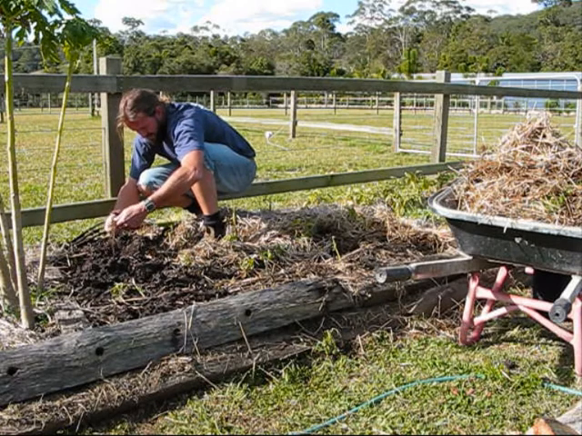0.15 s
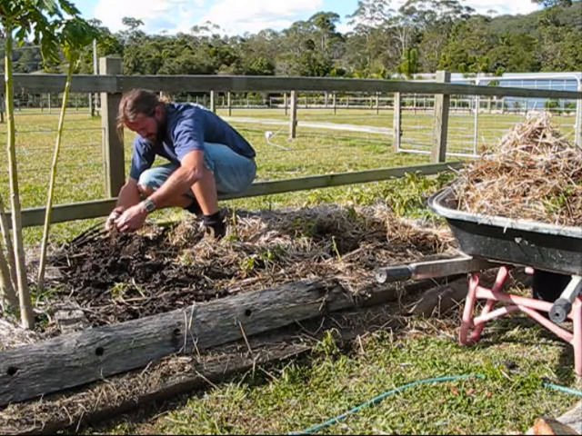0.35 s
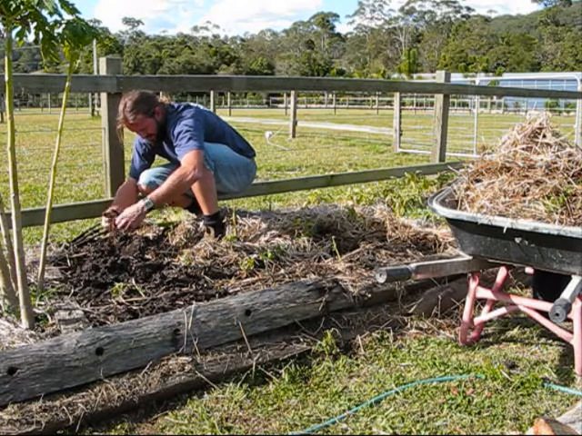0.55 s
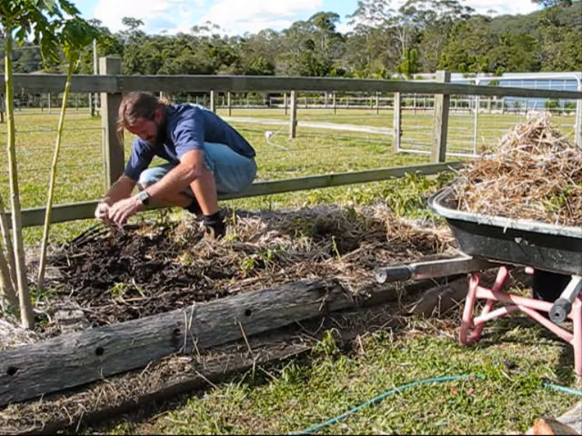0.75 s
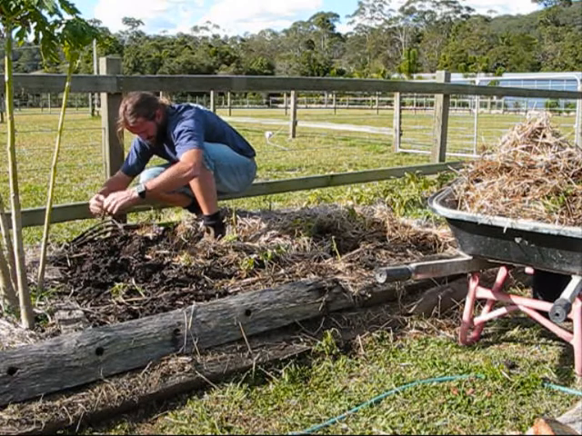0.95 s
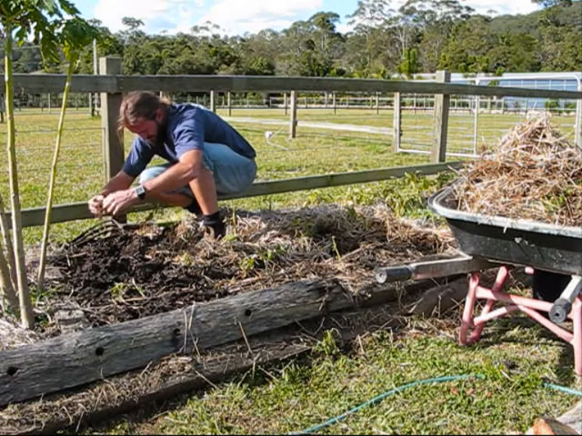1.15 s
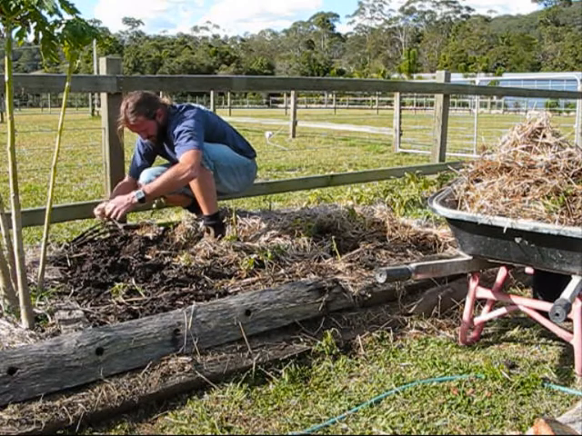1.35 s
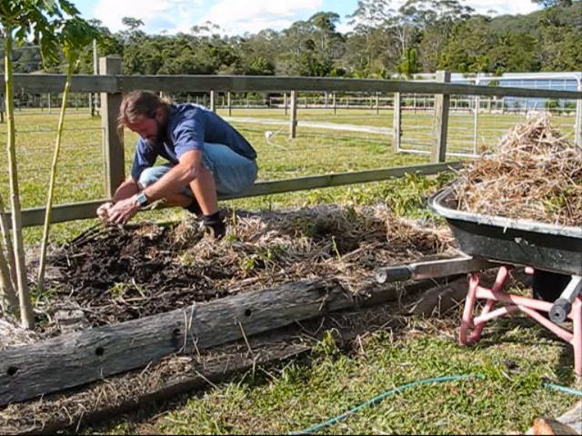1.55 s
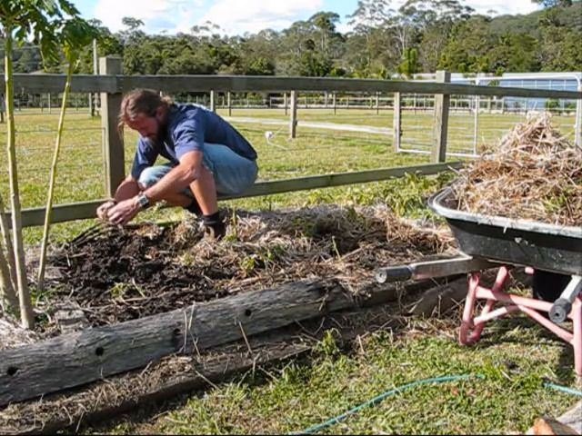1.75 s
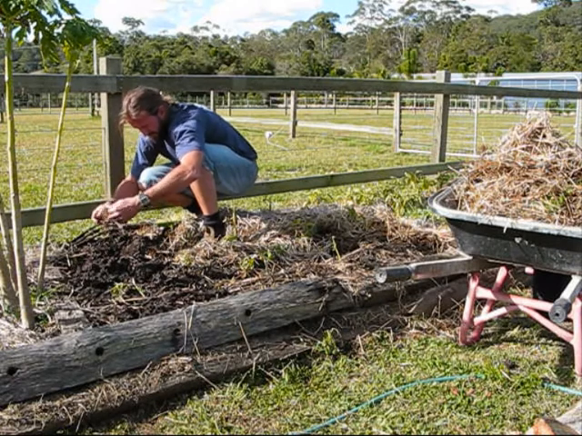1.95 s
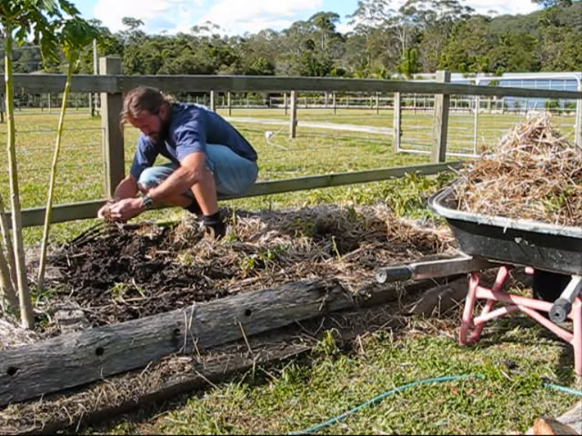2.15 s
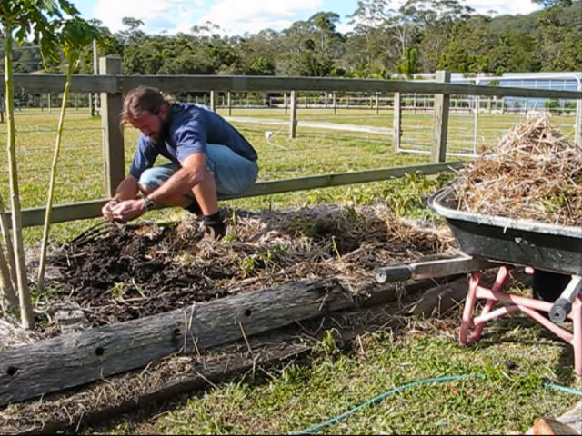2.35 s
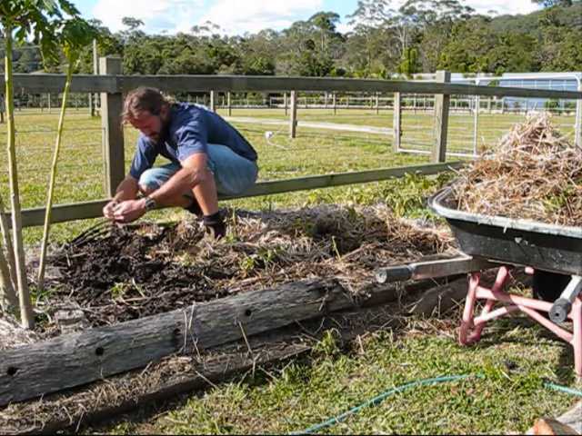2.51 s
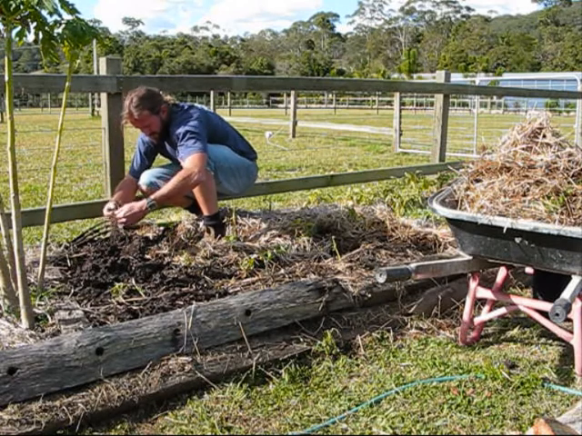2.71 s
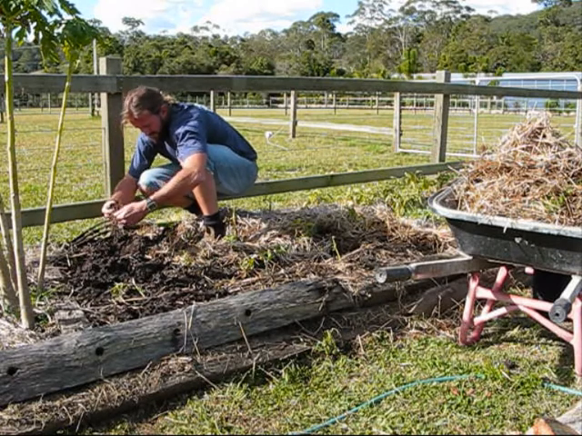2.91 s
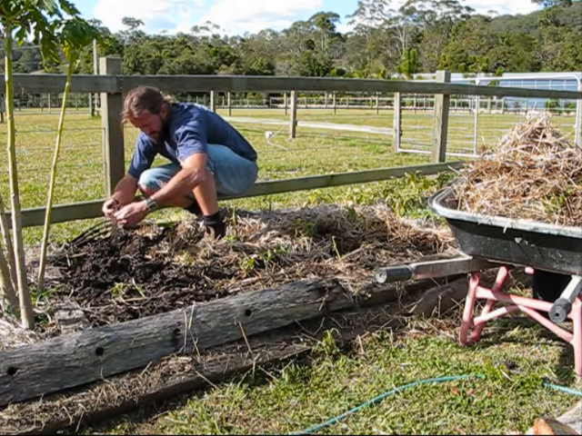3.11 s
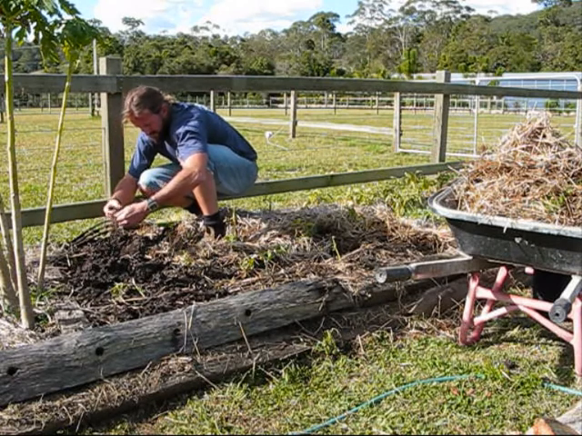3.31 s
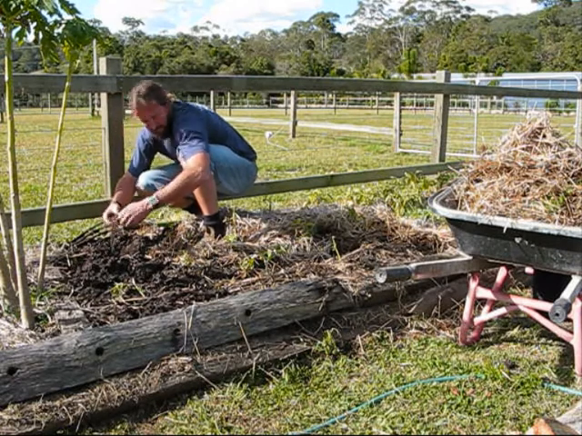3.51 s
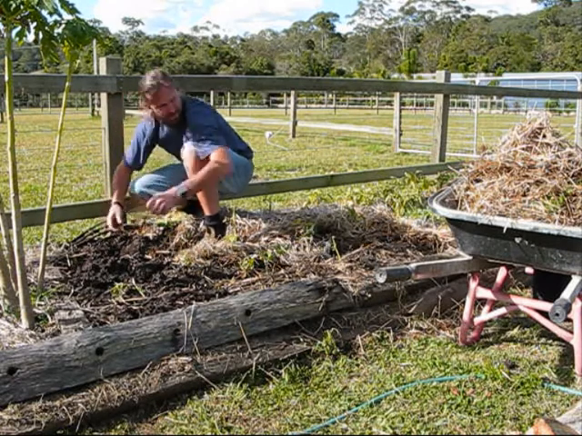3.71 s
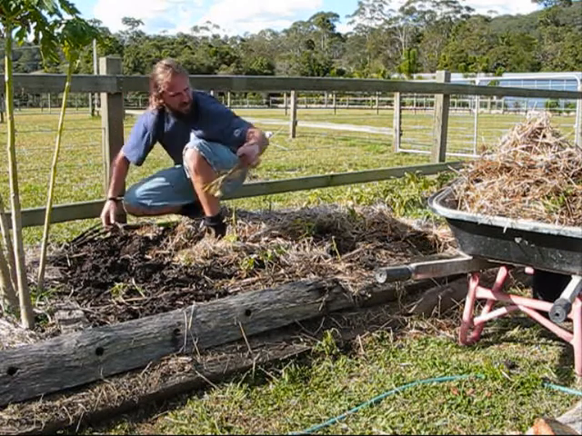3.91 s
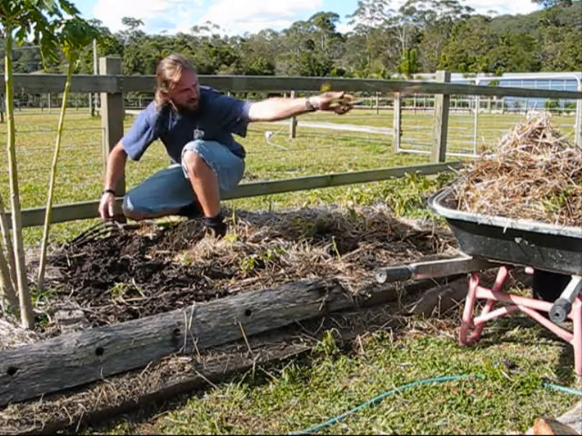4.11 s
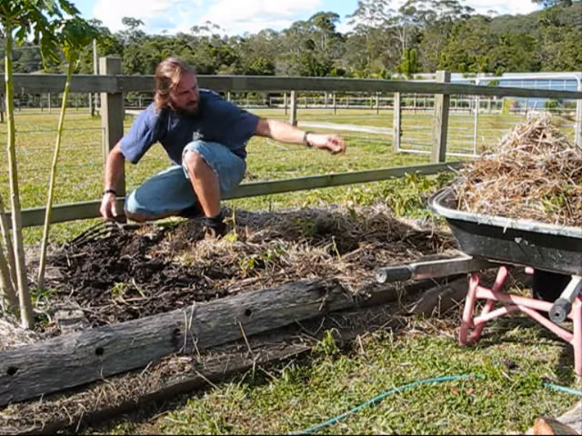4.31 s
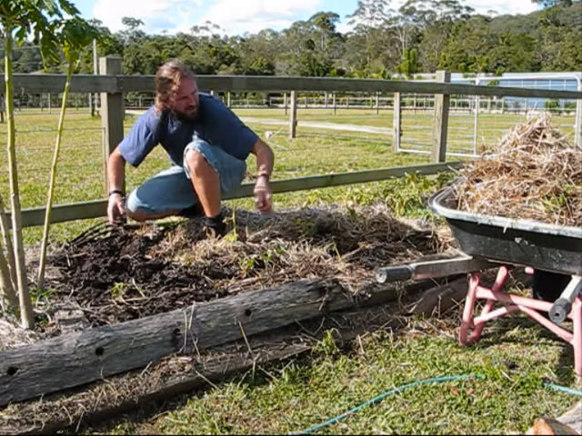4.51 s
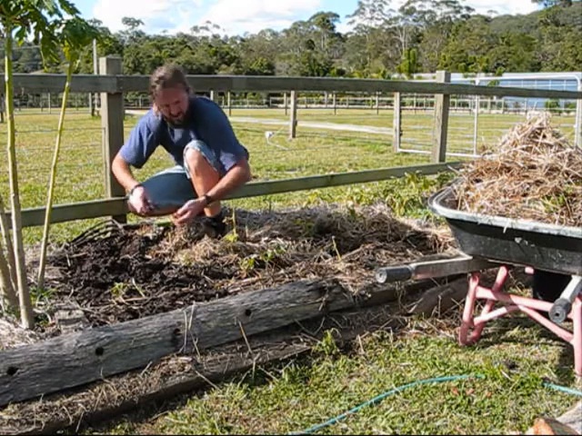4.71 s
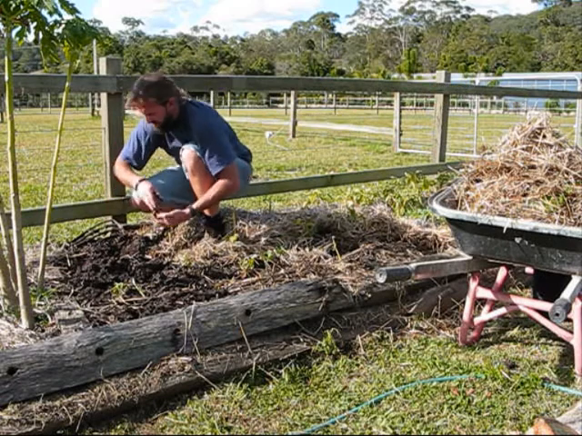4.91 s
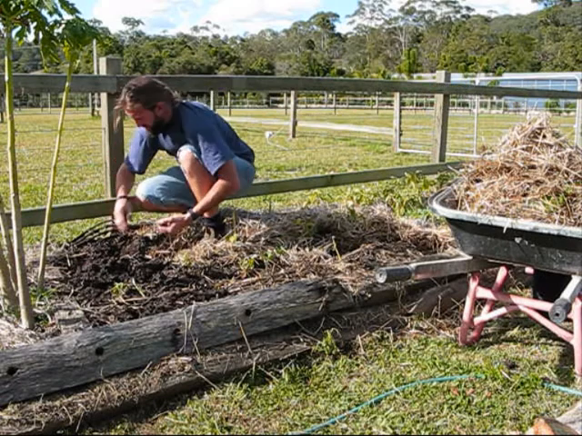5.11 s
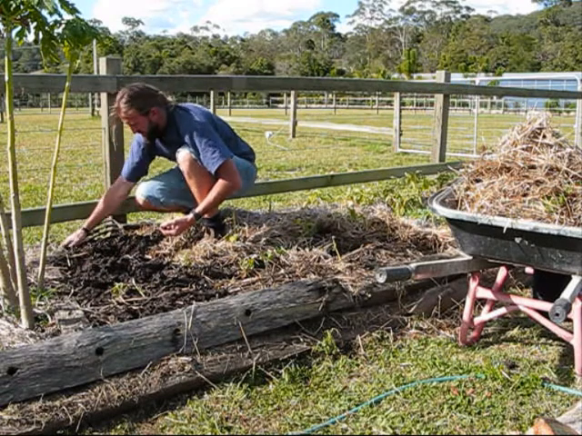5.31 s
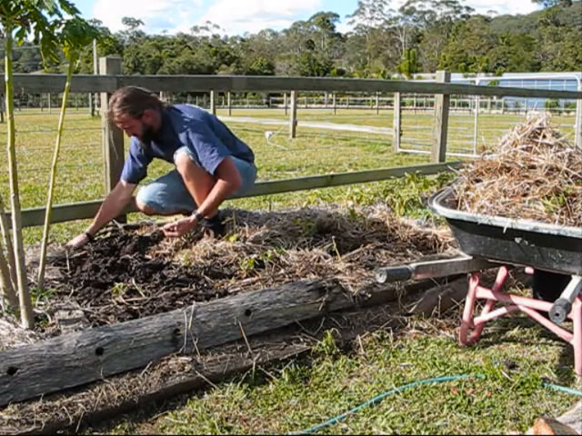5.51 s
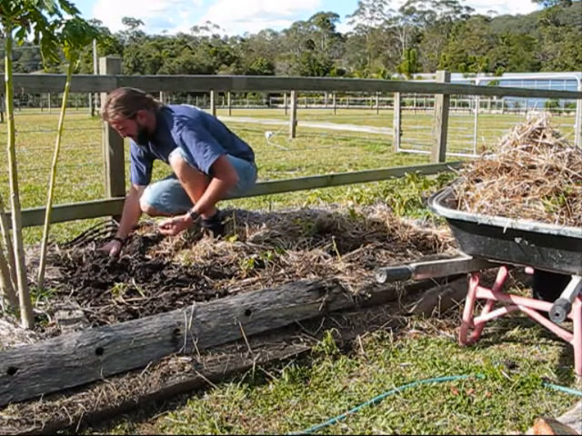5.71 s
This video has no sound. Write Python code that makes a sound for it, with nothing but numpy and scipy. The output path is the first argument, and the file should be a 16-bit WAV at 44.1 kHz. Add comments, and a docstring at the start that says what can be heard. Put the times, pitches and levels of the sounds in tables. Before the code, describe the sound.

Soft garden breeze and buzzing crickets, with one short raspy parrot call, light picking at mulch and a crackle of thrown straw.

```python
"""A garden in open country, one microphone feeding both channels. A few steps away a gardener picks
through soil and dry straw mulch, a rustle of tiny stalk fractures, then tosses a handful that crashes
into the straw close by. A parrot screeches once, in rasping syllables with a two-voiced middle.
Small birds whistle far off and bush crickets buzz their wings in the grass.
Under it all lie the hiss of a breeze in distant trees and a faint low drone."""
import sys
import numpy as np
from scipy import signal
from scipy.fft import rfft, irfft, next_fast_len
from scipy.io import wavfile
from scipy.ndimage import map_coordinates

SR = 44100
rng = np.random.default_rng(int(sys.argv[2]) if len(sys.argv) > 2 else 0)


def store_pcm(level_fs):
    """Save levels as 16-bit WAV."""
    pcm = np.round(np.clip(level_fs, -1, 1) * 32767).astype(np.int16)
    wavfile.write(sys.argv[1], SR, np.atleast_2d(pcm).T)


N = 253575
TOP_HZ = 15850

# Noise colours at the microphone. Each row: frequency in Hz, relative spectral level in dB.
BREEZE_COLOUR = [(15, -15), (40, -0.5), (300, -.5), (680, 0), (1200, -2.5), (1800, -4.5), (3200, -8),
                 (6000, -11.5), (8500, -11.5), (10000, -15.5), (12500, -20.5), (15500, -27.5)]
DRONE_COLOUR = [(60, -39), (76, 1), (82, 1.5), (89, -6), (110, -31)]
CHORUS_COLOUR = [(7200, -40), (7700, -9), (7870, -3), (8050, -9), (8600, -30), (9500, -50)]  # far crickets blurred into one thin band
MULCH_COLOUR = [(400, -20), (1200, -8), (2500, -4.5), (5000, -5), (8000, -3.5), (10500, -1.5),
                (13500, -0.5), (15800, -2.5)]  # straw mixed with damp soil
CLOD_COLOUR = [(300, -26), (1200, -18), (2400, -2.5), (5000, -0.5), (7200, -2.5), (10000, -17),
               (15800, -22)]
SPLINTER_COLOUR = [(1000, -30), (5000, -11), (9000, -2.5), (13500, 1.5), (15800, -3.5)]
RASP_COLOUR = [(1200, -31), (2400, -3), (3400, 0), (5000, -5), (6500, -7), (8000, -16), (10500, -14),
               (15800, -30)]
STRAW_COLOUR = [(500, -38), (1200, -16), (2500, -10), (5000, -7.5), (8000, -8), (10500, -5.5),
                (12500, -1.5), (14000, 0.5), (15800, -3.5)]

# Swells of sound. Each row: middle in seconds, length in seconds, level in dB.
BREEZE_GUSTS = [(3.6, 0.79, -56.5)]
CHORUS_SWELLS = [(.5, 1, -61.5), (2.6, 1.15, -61), (4.7, 2.4, -64.5)]
MULCH_STROKES = [(1.5, .12, -61), (2.05, .4, -62), (3.62, .09, -53), (3.88, .5, -50), (4.36, 0.23, -54),
                 (5.19, .22, -54.5), (5.41, 0.054, -47.5), (5.52, 0.22, -48), (5.698, .115, -41)]
SOIL_SCRAPES = [(3.695, 0.044, -52.5), (3.82, .16, -56.5), (4.17, .025, -52)]

# Single crickets in the grass. Each row: start and end in seconds, final centre pitch in Hz,
# final level in dB, swell in dB, wing strokes per second.
CRICKET_BUZZES = [(0, 1.245, 8670, -54, 16, 112), (1.5, 2.97, 8700, -54.5, 15, 111),
                  (4.1, 5.245, 8660, -53, 19, 113), (0, .62, 8120, -56.5, 11, 124),
                  (1.9, 2.62, 8150, -57, 10, 140), (3.5, 4.7, 8130, -57.5, 13, 124),
                  (3, 3.35, 9100, -66.5, 0, 150)]
# Fine straws breaking. Each row: start in seconds, relative level in dB.
STRAW_TICKS = [(0.0423, -42), (0.3137, -40), (1.4172, -37.5), (1.5035, -35.5), (1.7998, -40), (1.9969, -38),
               (2.0847, -44), (2.135, -35), (3.5947, -30), (4.1664, -39), (4.3301, -41), (5.0569, -35),
               (5.1013, -34), (5.2909, -38)]
# The screech. Each row: start and length in seconds, first and last pitch in Hz, accent in dB,
# octave against fundamental in dB, rasp from 0 to 1.
PARROT_SYLLABLES = [(.428, .026, 2380, 2480, 1, -7, 0.37), (.453, .03, 2140, 2150, -1, -0.5, .35),
                    (.481, 0.0213, 2205, 2390, -.5, 5, 0.27), (.523, .008, 2850, 2820, -0.5, 2, 0.6),
                    (.5475, .0045, 2520, 2680, -3, 4.5, .35), (0.5528, 0.0049, 2460, 2840, -.5, 4.5, 0.5),
                    (.558, .014, 2777, 2510, 1.5, 0.5, .55), (.573, 0.0198, 2346, 2396, -1.3, -1, 0.68),
                    (.591, .019, 3420, 3270, 1.8, -18, 0.37), (.6, .014, 2560, 2290, -2, -1, 0.6),
                    (0.609, 0.0365, 2080, 2010, 0, 1.5, .15), (.644, .011, 2070, 2100, -6, 8.5, .25)]
# Colour of the parrot's harmonics above the octave. Each row: frequency in Hz, relative level in dB.
PARROT_OVERTONES = [(5500, -6), (7000, -20), (8500, -17), (10400, -8), (12200, -21), (13800, -16),
                    (15500, -27)]
# Far birds chirping. Each row: start and length in seconds, first and last pitch in Hz, level in dB.
BIRD_CHIRPS = [(0.864, .065, 2480, 2130, -52), (5.154, .026, 4250, 4120, -55.5),
               (5.175, .026, 2980, 3850, -47.5), (5.196, .017, 4550, 4180, -49),
               (5.208, .038, 3150, 3820, -50), (5.242, .034, 4600, 4820, -56),
               (5.494, .028, 2200, 2150, -56)]
# One far bird's repeated slur. Each row: start in seconds, lowest pitch in Hz, level in dB.
BIRD_SLURS = [(2.33, 4500, -58.5), (2.672, 4970, -58), (5.39, 4790, -57.5)]
# Stalks snapping and clods knocking. Each row: start in seconds, relative level in dB,
# gain of the knock and ring in dB, time to fall 60 dB in seconds.
STALK_SNAPS = [(3.947, -31, 2.5, 0.009), (4.4648, -21.5, -10, .016), (4.5505, -17.5, -6, .008),
               (4.5655, -16, 0.3, 0.031), (4.5915, -26, -1, .01), (4.611, -14, -7.5, .008),
               (4.7498, -26.2, -9, 0.056), (4.976, -38.5, 4.5, .02), (5.451, -24.5, -9, 0.014)]
# A dry stalk's ring. Each row: frequency in Hz, relative level in dB, time to fall 60 dB in seconds.
STALK_MODES = [(2620, -5.5, .025), (3500, -7, 0.029), (4970, 0, 0.037), (5540, -5, 0.022), (7330, -3, .02)]


def amp(db):
    return 10 ** (np.asarray(db) / 20)


def unit_rms(x):
    return x / np.sqrt(np.mean(x ** 2) + 1e-20)


def add(track, start, sound):
    """Mix a sound into the track, start seconds in."""
    i = round(start * SR)
    part = sound[max(-i, 0):max(N - i, 0)]
    track[max(i, 0):][:len(part)] += part


def span(start, length):
    """The sample times of one sound, and its progress from 0 to 1."""
    progress = np.linspace(0, 1, max(round(length * SR), 8))
    return start + np.arange(len(progress)) / SR, progress


def wobble(rate, n):
    """A smooth random curve, rate knots a second."""
    return map_coordinates(rng.standard_normal(int(n * rate / SR) + 4), [np.arange(n) * rate / SR])


def fade(t, edge):
    """Soft ends, edge seconds long."""
    return np.clip(np.minimum(t - t[0], t[-1] - t) / edge, 0, 1)


def swells(rows):
    """Gain of overlapping bell-shaped swells, each at half height at the ends of its length."""
    t = np.arange(N) / SR
    bells = (amp(db) * .5 ** ((2 * (t - middle) / length) ** 2) for middle, length, db in rows)
    return np.sqrt(sum(bell ** 2 for bell in bells))


def coloured(x, colour):
    """x filtered to a colour, at rms 1."""
    size = next_fast_len(len(x) + 2048)
    hz, db = np.transpose(colour)
    gain = amp(np.interp(np.log(np.fft.rfftfreq(size, 1 / SR) + 1), np.log(hz), db))
    return unit_rms(irfft(rfft(x, size) * gain, size)[:len(x)])


def noise(colour, n):
    return coloured(rng.standard_normal(n), colour)


def phase(hz):
    return 2 * np.pi * np.cumsum(hz) / SR


def country_air():
    """Wind in the far trees, freshening once, over a faint low drone."""
    breeze = np.hypot(amp(-48.5), swells(BREEZE_GUSTS)) * amp(.2 * wobble(6.04, N))
    return breeze * noise(BREEZE_COLOUR, N) + amp(-65.5) * noise(DRONE_COLOUR, N)


def crickets(sweep_hz=900, climb_hz=300, jitter_hz=120, flicker_db=1.4):
    """Each wing stroke is a falling blip; a buzz swells, climbs and stops dead. A chorus lies behind."""
    out = np.zeros(N)
    for start, end, final_hz, db, swell_db, rate in CRICKET_BUZZES:
        t, progress = span(start, end - start)
        n, to_go = len(t), 1 - progress
        stroke = np.cumsum(rate * (1 + .02 * wobble(12, n))) / SR % 1
        hz = final_hz - climb_hz * to_go + sweep_hz * (.5 - stroke) + jitter_hz * wobble(900, n)
        blips = np.sin(np.pi * stroke) ** 2 * np.sin(phase(hz))
        buzz = unit_rms(blips * amp(flicker_db * wobble(100, n)))
        add(out, start, buzz * amp(db - swell_db * to_go ** 1.5) * fade(t, .011))
    return out + swells(CHORUS_SWELLS) * noise(CHORUS_COLOUR, N)


def rustle(colour, per_second, spread_db, clump_db):
    """Tiny fractures of uneven size, bunched in clumps, at rms 1."""
    size = amp(spread_db * np.minimum(rng.exponential(size=N), 4))
    cracks = (rng.random(N) < per_second / SR) * rng.choice([-1, 1], N) * size
    return coloured(cracks * amp(clump_db * wobble(90, N)), colour)


def hands(picking_db=-64.5):
    """A few steps off, restless fingers stroke the mulch and scrape the soil; crumbs drop on straw."""
    movement = np.hypot(amp(picking_db), swells(MULCH_STROKES))
    mulch = movement * rustle(MULCH_COLOUR, per_second=5000, spread_db=2.5, clump_db=1.5)
    soil = swells(SOIL_SCRAPES) * rustle(CLOD_COLOUR, per_second=3000, spread_db=3, clump_db=1)
    crumbs = amp(-70) * rustle(SPLINTER_COLOUR, per_second=30, spread_db=2, clump_db=1.5)
    return mulch + soil + crumbs


def burst(colour, t60, hold_s=.00087):
    """The noise of one break or knock: held an instant, then falling 60 dB in t60 seconds."""
    t = np.arange(SR // 10) / SR
    return noise(colour, len(t)) * amp(-60 * np.maximum(t - hold_s, 0) / t60)


def straw_ticks(gain_db=-7.5):
    """Fine straws break one at a time, each a small bright burst."""
    out = np.zeros(N)
    for start, db in STRAW_TICKS:
        add(out, start, amp(db + gain_db) * burst(SPLINTER_COLOUR, t60=.02))
    return out


def parrot(gain_db=-38.8, peak_s=.55, rasp_hz=620, jitter=.017):
    """Harmonic syllables break into rasp, under one swell and fade of effort that also brightens them."""
    swell_db_per_s, fade_db_per_s = 104, 100
    sag_hz_per_s = 2300  # the longer a syllable, the deeper its pitch dips in the middle
    brightening = .7  # dB of extra high overtones per dB of effort
    out = np.zeros(N)
    for start, length, first_hz, last_hz, accent_db, octave_db, rasp in PARROT_SYLLABLES:
        t, progress = span(start, length)
        n = len(t)
        hz = first_hz + (last_hz - first_hz) * progress - sag_hz_per_s * length * np.sin(np.pi * progress)
        effort_db = -np.maximum(swell_db_per_s * (peak_s - t), fade_db_per_s * (t - peak_s))
        angle = phase(hz * (1 + jitter * (.4 + 2 * rasp) * wobble(706, n)))
        upper = np.zeros(n)
        for k in range(3, 8):
            overtone_db = np.interp(k * hz, *np.transpose(PARROT_OVERTONES))
            upper += amp(overtone_db) * (k * hz < TOP_HZ) * np.sin(k * angle)
        tone = np.sin(angle) + amp(octave_db) * (np.sin(2 * angle) + amp(brightening * effort_db) * upper)
        rattle = np.sin(phase(rasp_hz * (1 + .25 * wobble(197, n))))
        flutter = 1 + rasp * (rattle + .44 * wobble(2210, n))
        hoarse = np.sqrt(2) * rasp * noise(RASP_COLOUR, n)
        voice = amp(2.5) * tone * flutter + hoarse
        add(out, start, amp(gain_db + accent_db + effort_db) * voice * fade(t, .12 * length))
    return out


def parrot_two_voices(held_hz=3584, second_hz=893, scoop_hz=150, attack_s=.005, gain_db=-39.3):
    """Mid-screech the pitch scoops up and holds; the second side of the syrinx beats against the first."""
    out = np.zeros(N)
    t, _ = span(start=.498, length=.029)
    effort = 1 - np.exp(-(t - t[0]) / attack_s)
    hz = held_hz - scoop_hz * (1 - effort)
    first = phase(hz * (1 + .006 * wobble(520, len(t))))
    second = phase(np.full(len(t), second_hz))
    sidebands = sum(amp(db) * np.sin(first + k * second)
                    for k, db in [(1, -4), (-1, -12), (2, -13), (3, -14.5)])
    overtone = amp(-13) * np.sin(3 * first) * (1 + 1.6 * np.cos(second))
    hoarse = amp(-10.5) * noise(RASP_COLOUR, len(t))
    voice = np.sin(first) + sidebands + overtone + hoarse
    add(out, t[0], np.sqrt(2) * amp(gain_db) * effort * voice * fade(t, .002))
    return out


def whistle(hz, progress, waver):
    """A thin, slightly unsteady tone that swells and fades in one arch."""
    arch = np.sqrt(2 * np.abs(np.sin(np.pi * progress)))
    return arch * np.sin(phase(hz * (1 + waver * wobble(250, len(progress)))))


def small_birds(slur_s=.11, drop_hz=850, drop_s=.074):
    """Whistles from far off: slurs that drop and level out, and short straight glides."""
    out = np.zeros(N)
    for start, lowest_hz, db in BIRD_SLURS:
        t, progress = span(start, slur_s)
        hz = lowest_hz + drop_hz * (1 - (t - start) / drop_s) ** 2
        add(out, start, amp(db) * whistle(hz, progress, waver=.006))
    for start, length, first_hz, last_hz, db in BIRD_CHIRPS:
        _, progress = span(start, length)
        hz = first_hz + (last_hz - first_hz) * progress
        add(out, start, amp(db) * whistle(hz, progress, waver=.02))
    return out


def stalk_snaps(gain_db=-7):
    """Each break throws bright splinters over the duller knock of a clod and the stalk's brief ring."""
    out, t = np.zeros(N), np.arange(SR // 10) / SR
    for start, db, body_db, t60 in STALK_SNAPS:
        ring = sum(amp(mode_db + rng.normal(0, 1.3) - 60 * t / mode_t60) * np.sin(2 * np.pi * hz * t)
                   for hz, mode_db, mode_t60 in STALK_MODES)
        body = amp(-1) * burst(CLOD_COLOUR, t60) + amp(-7) * ring
        splinters = amp(-2.5) * burst(SPLINTER_COLOUR, t60)
        add(out, start, amp(db + gain_db) * (splinters + amp(body_db) * body))
    return out


def toss(touch_s=4.443, attack_s=.068):
    """A handful crashes down near the microphone; the straw settles while soil trickles through it."""
    t = np.arange(N) / SR - touch_s

    def landing(db, fall_db_per_s):
        return np.clip(t / attack_s, 0, 1) * amp(db - fall_db_per_s * np.maximum(t - attack_s, 0))

    crash, settle, trickle = landing(-28.5, 135), landing(-37.5, 28.6), landing(-52, 28)
    straw = rustle(STRAW_COLOUR, per_second=14000, spread_db=2.5, clump_db=1.2)
    soil = rustle(CLOD_COLOUR, per_second=4000, spread_db=2.5, clump_db=1.2)
    return np.hypot(crash, settle) * straw + trickle * soil


def garden_scatter(x, t60=.19):
    """A short tail of reflections from fence and trees."""
    t = np.arange(SR // 2) / SR
    tail = rng.standard_normal(len(t)) * amp(-60 * t / t60) * (t > .004)
    return signal.fftconvolve(x, tail / np.linalg.norm(tail))[:N]


def scene():
    """The parrot is the nearest caller; small birds and crickets reach the microphone with more scatter."""
    near = parrot() + parrot_two_voices()
    far = small_birds() + crickets()
    scatter = garden_scatter(amp(-13) * near + amp(-10.5) * far)
    gardener = hands() + toss() + stalk_snaps() + straw_ticks()
    mono = gardener + near + far + scatter + country_air()
    return np.array([mono, mono])


def record(dry):
    """The microphone chain passes nothing above TOP_HZ."""
    size = next_fast_len(N + SR // 2)
    passband = np.fft.rfftfreq(size, 1 / SR) < TOP_HZ
    return irfft(rfft(dry, size) * passband, size)[:, :N]


dry = scene()
out = record(dry)
store_pcm(out)
```